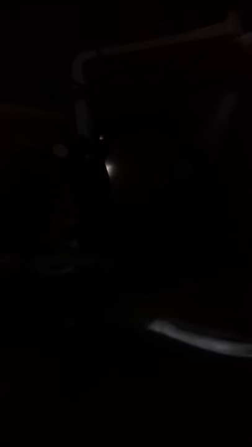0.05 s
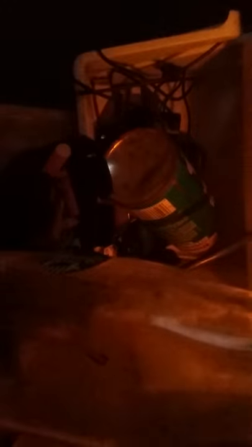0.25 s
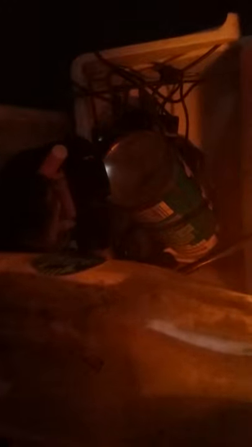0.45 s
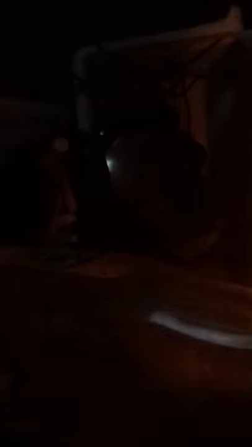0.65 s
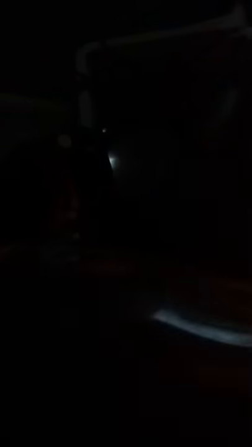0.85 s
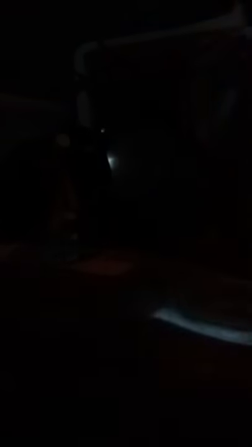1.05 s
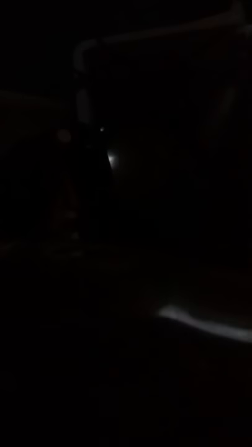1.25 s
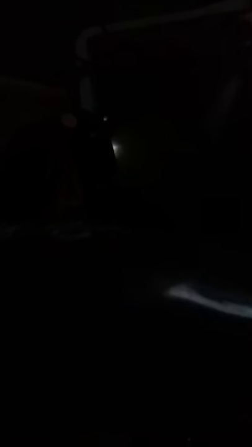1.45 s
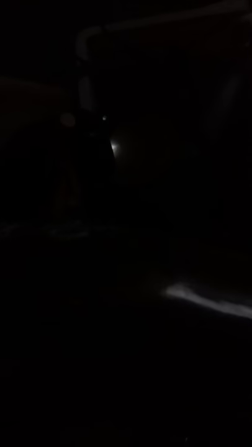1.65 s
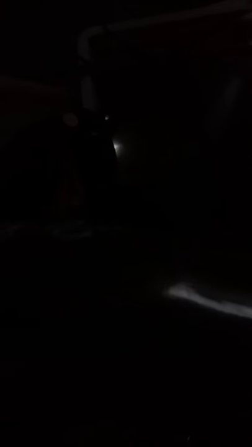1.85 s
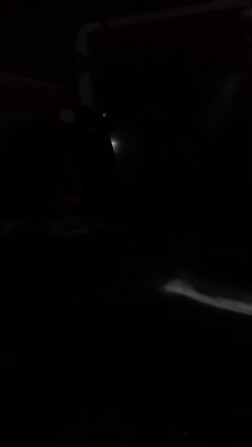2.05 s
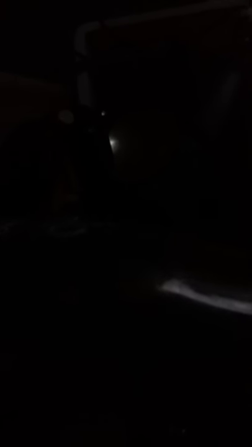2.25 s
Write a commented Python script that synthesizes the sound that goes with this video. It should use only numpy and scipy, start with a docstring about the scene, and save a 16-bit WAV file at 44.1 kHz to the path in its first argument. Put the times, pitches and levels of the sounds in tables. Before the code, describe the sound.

One bright crack of igniting vapour comes almost at once, with a soft puff and a short metallic ring that dies quickly in a small room. A quiet, slightly wavering hum runs throughout, with a faint dull knock later.

```python
"""A small dark room with a mains hum, where fuel vapour ignites in a tin can standing in a tub.
A brief sizzle swells into one sharp, bright crack, with a soft puff of expanding gas under it.
The crack drives the can, which rings on in its normal modes, and the room answers with early echoes
and reverberation. Faint ticks come before and after, and once a dull double knock.
Throughout, the hum and the room noise waver in level together."""
import sys
import numpy as np
from scipy import signal
from scipy.fft import rfft, irfft
from scipy.io import wavfile

SR = 44100
rng = np.random.default_rng(int(sys.argv[2]) if len(sys.argv) > 2 else 0)


def bounce(signal):
    """Save signal as a 16-bit WAV file at the path given by the first command-line argument."""
    frames = np.transpose(np.atleast_2d(signal))
    limited = np.clip(frames, -1, 1)
    pcm = np.round(limited * 32767).astype(np.int16)
    wavfile.write(sys.argv[1], SR, pcm)


N = 105840
TIME = np.arange(N) / SR
BIN_HZ = np.arange(N // 2 + 1) * SR / N
CRACK_S, CRACK_HOLD_S = 0.2249, 0.0018


def from_db(db):
    """Amplitude ratio of a level in decibels."""
    return 10 ** (np.asarray(db) / 20)


def unit_rms(x):
    """Normalisation to unit mean power."""
    return x / np.sqrt(np.mean(x ** 2) + 1e-20)


def at_hz(points, hz):
    """Interpolation on a logarithmic frequency axis."""
    points_hz, values = np.transpose(points)
    return np.interp(np.log(np.maximum(hz, 1)), np.log(points_hz), values)


def coloured_noise(spectrum):
    """Spectral shaping of white noise, at unit rms."""
    white = rfft(rng.standard_normal(N))
    return unit_rms(irfft(white * from_db(at_hz(spectrum, BIN_HZ)), N))


def band_noise(low_hz, high_hz):
    """Band-pass filtered noise in its steady state, at unit rms."""
    sos = signal.butter(2, [low_hz, high_hz], "band", fs=SR, output="sos")
    return unit_rms(signal.sosfilt(sos, rng.standard_normal(N + SR))[SR:])


def decay(start_s, t60_s, hold_s=0):
    """Exponential decay after a sudden onset and a hold: 60 dB in t60_s."""
    return (TIME >= start_s) * np.exp(-np.log(1000) * np.maximum(TIME - start_s - hold_s, 0) / t60_s)


def burst(carrier, envelope):
    """Amplitude modulation, scaled to carry the energy of the envelope."""
    shaped = carrier * envelope
    return shaped * np.sqrt(np.sum(envelope ** 2) / np.sum(shaped ** 2))


# Partials of the hum: harmonic_number, level_db, noise_to_tone_ratio
HUM_PARTIALS = [(1, -54, .12), (2, -46.5, 0.06), (3, -64.5, .3)]

def mains_hum(fundamental_hz=120.1):
    """A harmonic series; each partial beats irregularly with the narrow band of noise around it."""
    hum = 0
    for harmonic, level_db, noise_ratio in HUM_PARTIALS:
        hz = harmonic * fundamental_hz
        tone = np.sqrt(2) * np.sin(2 * np.pi * (hz * TIME + rng.random()))
        hum += from_db(level_db) * (tone + noise_ratio * band_noise(hz - 10, hz + 10))
    return hum


# Resonances of the drone: centre_hz, bandwidth_hz, level_db
DRONE_RESONANCES = [(159.7, 2.5, -62), (320.3, 3.87, -64.5), (465.9, 13, -61), (562.6, 15, -70),
                    (656.6, 12, -66), (691, 10, -67), (921, 49, -69), (988.5, 9.4, -68), (1090, 44, -71.5)]
# Spectral density of the room noise: frequency_hz, relative_db
ROOM_NOISE_SPECTRUM = [(25, -30), (45, -26), (65, -13), (85, -3.5), (140, -9.5), (205, -1), (265, 4),
                       (305, -7.5), (420, -6), (660, -8), (790, -12.5), (1050, -8), (1280, -12.5),
                       (1420, -17.5), (1900, -16.5), (2450, -21.5), (2850, -25), (3250, -28.5), (4000, -27),
                       (4550, -22), (5600, -27), (8000, -29), (15500, -30)]

def room_noise():
    """Narrow resonances concentrate noise into a pitched drone above a broadband floor."""
    drone = sum(from_db(level_db) * band_noise(hz - width_hz / 2, hz + width_hz / 2)
                for hz, width_hz, level_db in DRONE_RESONANCES)
    return drone + from_db(-52.5) * coloured_noise(ROOM_NOISE_SPECTRUM)


# Contour of the background's wavering, before offset and scaling: time_s, level_db
WAVER_CONTOUR = [(0.0, -46.5), (0.05, -54.5), (0.07, -44), (0.18, -48.5), (0.23, -42), (0.41, -49.5),
                 (0.44, -43), (0.65, -53), (0.66, -60.5), (0.68, -45), (0.75, -43.5), (0.76, -54.5),
                 (0.78, -44), (0.81, -50), (1.11, -45.5), (1.14, -50.5), (1.22, -43), (1.42, -50),
                 (1.44, -56.5), (1.48, -46.5), (1.49, -54.5), (1.63, -44.5), (1.66, -45.5), (1.69, -53),
                 (1.86, -54), (1.88, -47.5), (1.98, -49), (2.0, -45), (2.08, -42.5), (2.12, -54.5),
                 (2.14, -48), (2.2, -44), (2.23, -47.5), (2.4, -46.5)]

def wavering_background():
    """Comodulation: hum and room noise share one contour, the noise swinging about half as many dB."""
    waver_db = np.interp(TIME, *np.transpose(WAVER_CONTOUR)) + 45.5
    return mains_hum() * from_db(0.99 * waver_db) + room_noise() * from_db(0.53 * waver_db)


# Faint bright ticks: start_s, level_db, centre_hz, edge_to_centre_ratio, t60_s
TICK_EVENTS = [(0.1269, -45, 4600, 1.24, 0.0086), (0.2056, -40, 6800, 1.2, 0.0074),
               (0.933, -55, 4560, 1.08, .01), (2.1481, -53, 4200, 1.17, .01),
               (2.1674, -53, 4400, 1.03, 0.0091), (2.1714, -53, 4340, 1.03, .012),
               (2.1797, -54.5, 4500, 1.16, .025)]

def ticks():
    """Damped narrow-band transients, each with a weaker, slower decay of room reverberation."""
    out = np.zeros(N)
    for start_s, level_db, hz, edge_ratio, t60_s in TICK_EVENTS:
        envelope = decay(start_s, t60_s) + from_db(-19) * decay(start_s, t60_s=0.11)
        out += from_db(level_db) * burst(band_noise(hz / edge_ratio, hz * edge_ratio), envelope)
    return out


# Spectral density of the sizzle: frequency_hz, relative_db
SIZZLE_SPECTRUM = [(800, -12), (2300, -11.5), (3200, -5), (4000, -2), (5400, -1), (8200, -8), (9500, -19),
                   (11500, -21.5), (14000, -12), (16000, -15)]

def sizzle(start_s=0.1945, start_db=-51.5, rise_db_per_s=360, swell_60db_s=0.0342):
    """Exponential growth: the igniting vapour's thin sizzle rises, then swells steeply into the crack."""
    rise = from_db(start_db + rise_db_per_s * (np.minimum(TIME, CRACK_S) - start_s))
    swell = from_db(-21) * np.exp(-np.log(1000) * np.abs(CRACK_S - TIME) / swell_60db_s)
    sounding = (TIME >= start_s) & (TIME < CRACK_S)
    return burst(coloured_noise(SIZZLE_SPECTRUM), np.hypot(rise, swell) * sounding)


# Spectral density of the crack: frequency_hz, relative_db
CRACK_SPECTRUM = [(60, -40), (300, -25.5), (1000, -24), (2000, -17), (3200, -13.5), (4300, -10.5),
                  (5200, -2), (6000, -7), (7300, -7), (10200, -22.5), (11600, -14), (15000, -12.5)]
# Early reflections from nearby walls: delay_s, gain_db
WALL_ECHOES = [(.0058, -15.5), (0.0195, -24)]

def crack(resonance_hz=5250):
    """Forced vibration: a burst of bright noise drives the can's main resonance; the walls echo both."""
    envelope = decay(CRACK_S, t60_s=0.0036, hold_s=CRACK_HOLD_S)
    blast = burst(coloured_noise(CRACK_SPECTRUM), envelope)
    forced = burst(np.sin(2 * np.pi * resonance_hz * (TIME - CRACK_S)), envelope)
    direct = from_db(-11.5) * blast + from_db(-16.5) * forced
    echoes = sum(from_db(gain_db) * np.roll(direct, int(delay_s * SR))
                 for delay_s, gain_db in WALL_ECHOES)
    return direct + echoes


def puff(centre_hz=240):
    """Expanding gas radiates a soft, low burst of noise two octaves wide."""
    return from_db(-46) * burst(band_noise(centre_hz / 2, centre_hz * 2), decay(CRACK_S, t60_s=0.14))


# Spectral density of the reverberation at its onset: frequency_hz, relative_db
REVERB_SPECTRUM = [(40, -33), (200, -15), (700, -14), (1400, -10), (3100, -12), (3800, -5.5), (4450, 1.5),
                   (4800, -2), (5300, 1.5), (5900, -2.5), (8000, -9), (10000, -12), (13000, -8.5),
                   (16000, -12.5)]
# Reverberation times of the room: frequency_hz, t60_s
REVERB_TIMES = [(300, 0.33), (1500, 0.2), (3600, 0.19), (7000, 0.23), (14000, .205)]

def reverberation(build_s=0.0005):
    """Diffuse field: dense reflections of the crack merge into noise, each octave dying at its own rate."""
    spectrum = rfft(coloured_noise(REVERB_SPECTRUM))
    edges_hz = 80 * 2 ** np.arange(9)
    tail = 0
    for low_hz, high_hz in zip(edges_hz, edges_hz[1:]):
        octave = irfft(spectrum * (BIN_HZ >= low_hz) * (BIN_HZ < high_hz), N)
        tail += octave * decay(CRACK_S, at_hz(REVERB_TIMES, np.sqrt(low_hz * high_hz)))
    return from_db(-26) * tail * np.clip((TIME - CRACK_S) / build_s, 0, 1)


# Normal modes of the can: pitch_hz, relative_db, t60_s
CAN_MODES = [(3920, -14, 0.23), (4170, -11.5, .18), (4405, -6.5, 0.18), (4755, -11, .18), (5220, -3.5, .17),
             (5207, -8.5, 0.23), (5400, -7.5, .22), (5510, -2, .19), (5682, -9, .22), (6285, -17, .2),
             (6913, -24, 0.17), (7770, -10.5, .2), (8300, -10.5, .16), (13100, -16, .2)]

def can_ring(level_db=-31):
    """Free vibration: as the crack lets go, each mode of the can rings on as a damped sinusoid."""
    ring = 0
    for pitch_hz, relative_db, t60_s in CAN_MODES:
        tone = np.sin(2 * np.pi * (pitch_hz * TIME + rng.random()))
        ring += from_db(level_db + relative_db) * decay(CRACK_S + CRACK_HOLD_S, t60_s) * tone
    return ring


# The double knock: start_s, level_db
KNOCK_EVENTS = [(0.932, -41), (0.9391, -45)]

def knocks(pitch_hz=670, t60_s=0.016):
    """Heavy damping: midrange noise dies within a few cycles and is heard as a dull knock."""
    return sum(from_db(level_db) * burst(band_noise(pitch_hz / 1.26, pitch_hz * 1.4), decay(start_s, t60_s))
               for start_s, level_db in KNOCK_EVENTS)


def scene():
    """Linear superposition of all the sources, in mono."""
    mix = wavering_background() + ticks()
    mix += sizzle() + crack() + puff() + reverberation() + can_ring()
    return (mix + knocks())[None]


def record(dry, ceiling=0.48, cutoff_hz=15750):
    """Soft saturation rounds the peak, and a steep low-pass filter removes the highest treble."""
    lowpass = signal.ellip(12, 0.1, 80, cutoff_hz, fs=SR, output="sos")
    return signal.sosfilt(lowpass, ceiling * np.tanh(dry / ceiling))


dry = scene()
out = record(dry)
bounce(out)
```